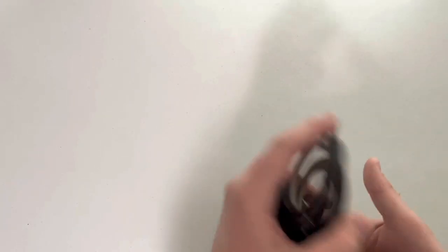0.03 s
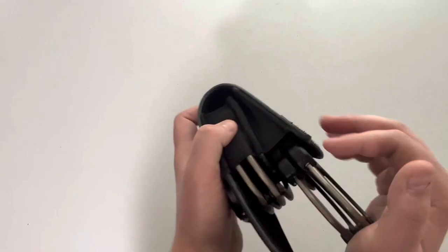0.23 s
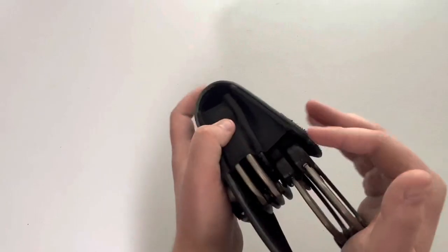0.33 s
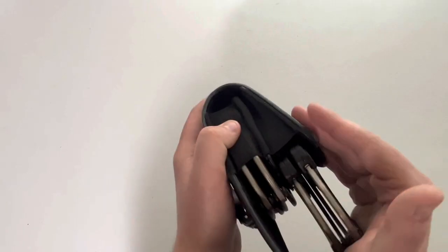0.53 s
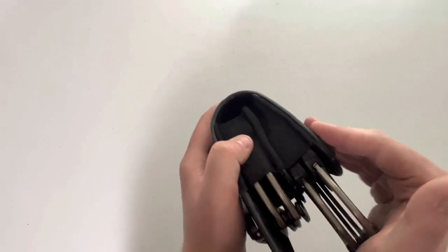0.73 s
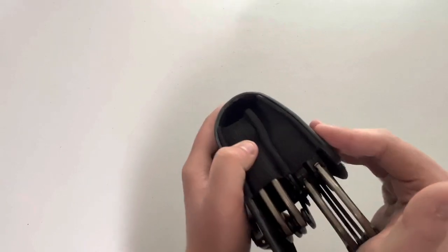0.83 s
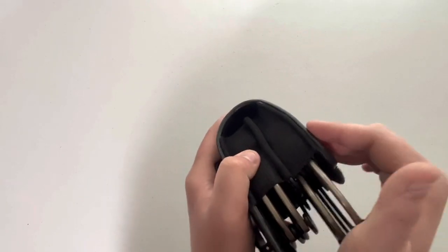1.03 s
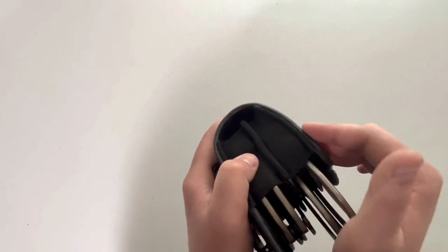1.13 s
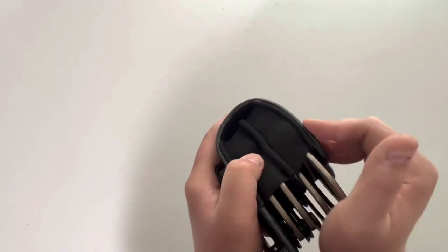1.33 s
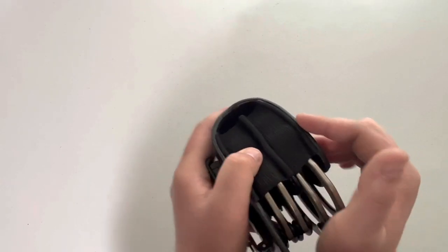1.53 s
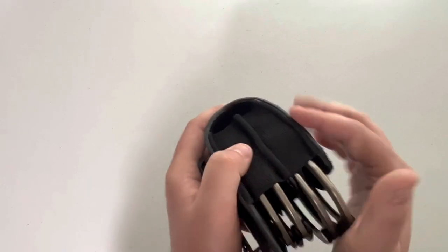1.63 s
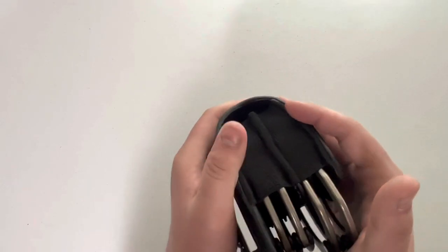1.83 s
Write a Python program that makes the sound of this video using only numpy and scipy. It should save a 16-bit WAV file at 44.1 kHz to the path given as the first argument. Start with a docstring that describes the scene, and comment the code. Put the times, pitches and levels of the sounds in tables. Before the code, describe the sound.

A sharp clatter of metal blades unfolding, followed by two plastic snaps and light ticks.

```python
"""Over a low room rumble and a faint rub of fingers, a latch pings and metal blades scrape and clatter
open, then break off abruptly. Hands are unfolding a plastic blade holder in a small quiet room, close
to a phone's stereo microphone. Fingers slide over the shell and excite the air in the cupped hand;
the shell snaps twice and gives small ticks and knocks, and a loose blade ticks near the end.
Each blow rings the modes of the part it hits; hard contacts add a crack of noise."""
import sys
import numpy as np
from scipy import signal
from scipy.fft import rfft, irfft, next_fast_len
from scipy.io import wavfile

SR = 44100
rng = np.random.default_rng(int(sys.argv[2]) if len(sys.argv) > 2 else 0)


def generate_wav(sig):
    """Save sig (samples, or channels by samples) to the path in sys.argv[1] as 16-bit PCM at SR."""
    pcm = np.round(np.clip(np.atleast_2d(sig).T, -1, 1) * 32767).astype(np.int16)
    wavfile.write(sys.argv[1], SR, pcm)


N = 83790

# Levels are relative; balance is left over right at the microphone.
# room tone: (frequency [Hz], level [dB])
RUMBLE_SPECTRUM = [(20, -18), (40, -16.5), (58, 3.5), (75, -0.5), (120, -3.5), (180, -14.5), (300, -21.5),
                   (600, -32), (2000, -36.5), (6000, -46.5), (16000, -65.5)]
# finger friction: (time [s], body level [dB], rasp level [dB], hiss level [dB])
RUB_LEVELS = [(0, -64.5, -99, -77.5), (.07, -101, -61.5, -88), (.11, -67.5, -54.5, -54.5),
              (.22, -65.5, -50.5, -85), (0.253, -55.5, -75.5, -101), (.30, -65, -85, -94),
              (.385, -57, -66.5, -91), (.44, -66.5, -67.5, -87), (.49, -72.5, -77.5, -90),
              (0.544, -62.5, -68.5, -93), (.585, -49.5, -54, -70), (.63, -56, -62, -91),
              (.70, -55.5, -62, -69), (.79, -56.5, -61, -62.5), (.88, -54, -60, -61),
              (.955, -54.5, -63, -61.5), (.995, -58, -72, -80.5), (1.041, -60.5, -70, -81),
              (1.09, -57, -64.5, -70), (1.15, -51.5, -56.5, -67.5), (1.195, -54, -55, -57.5),
              (1.229, -55, -52.5, -49), (1.29, -62, -62, -54.5), (1.351, -65, -69.5, -60.5),
              (1.395, -72.5, -75, -83), (1.455, -60, -63.5, -69), (1.50, -60.5, -64, -72),
              (1.525, -63.5, -67, -72), (1.564, -73, -61.5, -46), (1.606, -69, -61, -67),
              (1.655, -83, -79.5, -96), (1.701, -77, -62.5, -68), (1.726, -61, -55, -58.5),
              (1.77, -80.5, -74, -90), (1.9, -91.5, -71.5, -93)]
# its hollow body, rasp and treble hiss: (frequency [Hz], level [dB])
BODY_SPECTRUM = [(100, -15.5), (250, -5.5), (450, -7), (680, -10.5), (900, -3), (1080, -4), (1230, 0.5),
                 (1360, -8), (1520, -5), (1750, -4.5), (2200, -16.5), (3500, -22), (8000, -53)]
RASP_SPECTRUM = [(900, -26), (1700, 3.5), (2400, 3.5), (3600, -2.5), (5500, -7), (7500, -10.5),
                 (10000, -19), (16000, -32)]
HISS_SPECTRUM = [(2500, -26.5), (5000, -4), (7000, 3), (9200, 6), (10200, -18), (11500, 11.5), (12600, 1.5),
                 (13800, -13), (15200, 3), (16200, -5.5)]
# the latch letting go: (time [s], latch level [dB], spring level [dB])
LATCH_RELEASES = [(.0831, -51, -35.5), (0.1594, -29, -48), (.162, -45, -34)]
# blade strikes: (time [s], ring [dB], crack [dB], crack t60 [s], pivot knock [dB], balance [dB])
BLADE_STRIKES = [(0.0836, -61, -28.5, 0.013, -52.5, 1.5), (0.145, -53.5, -40, 0.038, -45.5, -1.5),
                 (0.1618, -46.5, -26.5, 0.036, -45.5, 0.5), (0.1829, -37.5, -23.5, 0.015, -31, -2),
                 (0.1869, -34.5, -27.5, 0.033, -48.5, 1), (0.1925, -35, -18.5, 0.008, -38.5, -5.5),
                 (0.1952, -37.5, -25, 0.043, -39, -3), (.2000, -27, -14, 0.013, -33, -3.5),
                 (0.2014, -13.5, -7, .016, -25, -1.5), (0.205, -24, -18.5, 0.013, -46, -1.5),
                 (0.2074, -31.5, -20.5, 0.016, -44, 4), (0.2129, -36, -23, .012, -42.5, -1),
                 (0.216, -37.5, -20.5, 0.0093, -43, 2.5), (0.2192, -35.5, -24, 0.017, -36, 4.5)]
# air resonance between hand and shell: (time [s], frequency [Hz], level [dB])
HOLLOW_TRACK = [(0.201, 1380, -85), (.26, 1385, -65), (.33, 1350, -59.5), (.4, 1322, -71),
                (.5, 1314, -74.5), (.62, 1290, -57), (.8, 1255, -64), (.95, 1241, -56), (1.06, 1221, -69),
                (1.2, 1208, -54), (1.349, 1180, -75), (1.499, 1148, -65), (1.649, 1146, -82)]
# shell clicks: (time [s], ring [dB], crack [dB], crack t60 [s], brightness [Hz], balance [dB])
SHELL_CLICKS = [(.7095, -29, -25.5, 0.0097, 18000, -0.5), (0.8027, -38, -32, 0.0066, 5083, 1),
                (0.804, -19.5, -18, 0.011, 13600, -1.5), (0.8094, -60, -28.5, 0.013, 11000, -5),
                (0.9694, -76, -51, 0.022, 15950, 1), (1.0093, -69, -59, 0.035, 16020, -1),
                (1.057, -76, -49, 0.0088, 22000, 1), (1.2103, -49, -47, 0.059, 16000, 0),
                (1.3168, -61.5, -55.5, .031, 15830, 15), (1.4215, -51.5, -56.5, 0.022, 3400, 6.5),
                (1.4855, -46.5, -54.5, 0.046, 4396, 3.5), (1.5335, -71, -45.5, 0.036, 18060, 1),
                (1.5610, -41, -46, 0.054, 13800, 2.5), (1.7088, -42.5, -40.5, 0.046, 4220, 2),
                (1.7170, -56, -51.5, 0.045, 4000, 5), (1.811, -68.5, -62, 0.053, 3930, 1),
                (1.8564, -73, -72, .025, 6000, 8)]
# knocks against the hand, snaps of the catch, ticks of a loose blade: (time [s], level [dB])
GRIP_KNOCKS = [(.2015, -48.5), (.804, -47), (1.718, -44)]
CATCH_SNAPS = [(0.7106, -32), (0.8063, -51), (1.4935, -55)]
LOOSE_BLADE_TICKS = [(1.486, -60), (1.8144, -58.5), (1.88, -61.5)]
# modes of each struck part: (frequency [Hz], level [dB], t60 [s], balance [dB])
LATCH_MODES = [(2294, 0, 0.035, -6), (6770, -7.5, .05, 5)]
SPRING_MODES = [(3630, -10, 0.045, 1), (8950, -5.5, .025, 2), (10674, -2, 0.02, 0),
                (12040, -7, .015, 0.087), (14950, -4.5, .01, 0.061)]
BLADE_MODES = [(1359, -25.5, 0.056, -1), (2772, -18, .13, -5.5), (4244, -17.5, .08, -2.5),
               (4920, -22.5, .06, 2.5), (6160, -14, 0.12, 8.5), (6311, -12, .08, 6), (6545, -8.5, .05, 6.5),
               (6810, 1.5, 0.049, 10), (7080, -5.5, .05, 6), (7250, -0.5, .032, 6), (8330, -5, .035, 3.5),
               (8860, -12.5, 0.044, 4), (9500, -9, .035, 1), (9950, -14, .04, -1.5),
               (11020, -10.5, .045, -3.5), (11450, -15, .04, 1), (15440, -3.5, .03, -2)]
PIVOT_MODES = [(1012.5, -14.5, 0.019, -1), (1397, -12.5, 0.034, -3), (1750, -14, .02, -4.5),
               (2163, -6.5, .02, -5), (2463, -2.5, .04, -3.5), (2738, -10.5, .04, -4.5),
               (3710, -12, .03, 4)]
GRIP_MODES = [(251, -18.5, 0.033, -2), (360, -17.5, 0.08, -0.5), (590.7, -8, 0.028, 2.5),
              (729, 0, 0.024, 0.5)]
SHELL_MODES = [(943.5, -6.5, 0.023, 0.5), (1065, -9.5, 0.021, 3.5), (1222, -8.5, 0.029, 0),
               (1631, -8, 0.024, -7), (1831, -4, 0.026, 3.5), (3435, -14, 0.011, -7),
               (5840, -4, 0.0065, 12.5), (8440, -7, 0.0077, 9.5), (9380, -2, 0.013, -6.5)]
CATCH_MODES = [(1838, -4.5, 0.035, -9.5), (2623, -6.5, 0.014, -6), (3700, -0.5, 0.016, 0),
               (7330, 2.5, 0.0063, 8), (9600, -9, 0.011, 2)]
LOOSE_BLADE_MODES = [(2552, 0, 0.037, -5), (3700, -9, .025, 6), (4564, -10, .025, 5)]
# contact noise of metal and of plastic: (frequency [Hz], level [dB])
METAL_CRACK_SPECTRUM = [(150, -18), (400, -16.5), (650, -23.5), (1050, -9.5), (1500, -6), (2500, -2),
                        (3300, -3.5), (4600, 1), (5500, -2), (7000, 6), (10500, 0.5), (12300, 2),
                        (13000, -4), (15300, -1), (16200, -5)]
SHELL_CRACK_SPECTRUM = [(150, -15.5), (400, -15), (680, -23), (950, -6.5), (1750, -4), (2200, -4),
                        (2700, -6), (3700, -5.5), (7000, -7), (11500, -1.5), (13500, -8.5), (15500, -6)]
# reflections from table top and walls: (frequency [Hz], level [dB])
ECHO_SPECTRUM = [(100, -5.5), (1000, 0), (3000, 4.5), (6000, 7), (10000, -7.5), (16000, -4)]

RUMBLE_DB, HOLLOW_WIDTH_HZ, ATTACK_S = -61, 137, 0.00051
SLIPS_PER_S, SLIP_SPREAD_DB, SMOOTH_SHARE = 4200, 1.5, 0.24
RUMBLE_WIDTH, RUB_WIDTH, CRACK_WIDTH = 0.17, 0.77, 0.55  # side over mid
MODE_PHASE_SPREAD_RAD = 0.64
BREAK_S, BREAK_DB, BREAK_T60_S = 0.2208, -14, 0.058  # the clatter drops here, then dies away
EARLY_DB, EARLY_T60_S, ROOM_DB, ROOM_T60_S, ECHO_DELAY_S = -9, 0.069, -13.5, 0.18, 0.002
ECHO_ALIKE_HZ = 2500  # below this the reflections reach both microphone ports alike
BLADE_LAG_S, SHELL_LAG_S = 0.000018, 0.00005  # delay at the right port
PEAK_LIMIT, TOP_HZ = 0.85, 16000


def undb(db):
    """Decibels to amplitude."""
    return 10 ** (np.asarray(db) / 20)


def colour(x, points):
    """Causal filter through (frequency [Hz], level [dB]) points that keeps the power of white noise."""
    size = next_fast_len(x.shape[-1] + 4096, real=True) // 2 * 2
    hz, db = np.array(points, float).T
    bin_hz = np.arange(size // 2 + 1) * SR / size
    gain = undb(np.interp(np.log(bin_hz + 1), np.log(hz), db))
    cepstrum = irfft(np.log(gain / np.sqrt(np.mean(gain ** 2))))
    cepstrum[1:size // 2] *= 2  # fold to minimum phase
    cepstrum[size // 2 + 1:] = 0
    return irfft(rfft(x, size) * np.exp(rfft(cepstrum)))[..., :x.shape[-1]]


def spread(pair, width):
    """Two unrelated signals, taken as mid and side, to left and right."""
    return (pair[0] + width * pair[1] * np.array([[1], [-1]])) / np.hypot(1, width)


def pan(db):
    """Left and right gains for a balance."""
    return undb(np.array([[db], [-db]]) / 2)


def fade(t, t60):
    """Exponential decay, 60 dB down at t60."""
    return np.exp(-np.log(1000) * t / t60)


def place(events):
    """Lay (time [s], sound) pairs on one stereo track."""
    out = np.zeros((2, N))
    for start, sound in events:
        i = int(start * SR)
        out[:, i:i + sound.shape[1]] += sound[:, :N - i]
    return out


def ring(modes, bright_hz=SR, scatter_db=0):
    """Decaying modes of one blow, alternating in sign and weighted by where it lands."""
    t, out = np.arange(SR // 5) / SR, 0
    for k, (hz, db, t60, balance) in enumerate(modes):
        # higher modes reach the two ports less alike
        phase = MODE_PHASE_SPREAD_RAD * min(hz / 5000, 1) * rng.standard_normal((2, 1))
        weight = (-1) ** k * undb(db + scatter_db * rng.standard_normal())
        gain = weight / np.hypot(1, (hz / bright_hz) ** 2)
        out = out + gain * pan(balance) * fade(t, t60) * np.sin(2 * np.pi * hz * t + phase)
    return out * np.minimum(t / ATTACK_S, 1)


def crack(spectrum, t60, bright_hz=SR):
    """The dense, quickly dying noise of a contact; soft contacts lose their treble."""
    t = np.arange(SR // 5) / SR
    noise = spread(rng.standard_normal((2, len(t))), CRACK_WIDTH)
    burst = noise * fade(t, t60) * np.minimum(t / ATTACK_S, 1)
    softened = [(hz, db - 10 * np.log10(1 + (hz / bright_hz) ** 4)) for hz, db in spectrum]
    return colour(burst, softened)


def rumble():
    """Room tone: low steady noise, nearly alike at both ports and a little to the right."""
    noise = colour(rng.standard_normal((2, N + SR // 4)), RUMBLE_SPECTRUM)[:, -N:]
    return undb(RUMBLE_DB) * pan(db=-3.5) * spread(noise, RUMBLE_WIDTH)


def fingers():
    """Skin catches and slips on the plastic: dense tiny clicks in the hollow shell, with rasp and hiss."""
    t, out = np.arange(N) / SR, 0
    times, *levels = np.array(RUB_LEVELS).T
    slipping = rng.random(N) < SLIPS_PER_S / SR
    slips = slipping * undb(SLIP_SPREAD_DB * np.minimum(rng.exponential(size=N), 5))
    roughness = np.hypot(slips / slips.std(), SMOOTH_SHARE) / np.hypot(1, SMOOTH_SHARE)
    parts = (BODY_SPECTRUM, RUB_WIDTH / 2), (RASP_SPECTRUM, RUB_WIDTH), (HISS_SPECTRUM, RUB_WIDTH)
    for db, (spectrum, width) in zip(levels, parts):
        grains = spread(rng.standard_normal((2, N)) * roughness, width)
        out = out + colour(grains * undb(np.interp(t, times, db)), spectrum)
    return out * undb(-2.5)


def latch():
    """The latch lets go with a ping and its small spring zings."""
    return place((start, undb(latch_db) * ring(LATCH_MODES) + undb(spring_db) * ring(SPRING_MODES))
                 for start, latch_db, spring_db in LATCH_RELEASES)


def blades():
    """Metal blades swing out close to the microphone, hit each other and knock in their pivot."""
    strikes = []
    for start, ring_db, crack_db, t60, pivot_db, balance in BLADE_STRIKES:
        ringing = undb(ring_db) * ring(BLADE_MODES, scatter_db=1.0)
        contact = undb(crack_db) * crack(METAL_CRACK_SPECTRUM, t60)
        knock = undb(pivot_db) * ring(PIVOT_MODES)
        strikes.append((start, pan(balance) * (ringing + contact + knock)))
    return place(strikes)


def cupped_hand():
    """Rubbing excites the air in the hand: one narrow, noisy resonance that sinks as the hand closes."""
    t = np.arange(N) / SR
    times, hz, db = np.array(HOLLOW_TRACK).T
    noise = rng.standard_normal(N) + 1j * rng.standard_normal(N)
    swell = signal.sosfilt(signal.butter(2, HOLLOW_WIDTH_HZ / 2, fs=SR, output="sos"), noise)
    phase = 2 * np.pi * np.cumsum(np.interp(t, times, hz)) / SR
    tone = np.real(swell * np.exp(1j * phase))
    return tone / tone.std() * undb(np.interp(t, times, db))


def grip():
    """The holder bumps against the hand with a dull knock."""
    return place((start, undb(db) * ring(GRIP_MODES)) for start, db in GRIP_KNOCKS)


def shell():
    """The plastic shell clicks and rings briefly, duller where the contact is soft."""
    clicks = []
    for start, ring_db, crack_db, t60, bright_hz, balance in SHELL_CLICKS:
        ringing = undb(ring_db) * ring(SHELL_MODES, bright_hz)
        contact = undb(crack_db) * crack(SHELL_CRACK_SPECTRUM, t60, bright_hz)
        clicks.append((start, pan(balance) * (ringing + contact)))
    return place(clicks)


def catch():
    """The catch inside the shell snaps and rings."""
    return place((start, undb(db) * ring(CATCH_MODES)) for start, db in CATCH_SNAPS)


def loose_blade():
    """A loose blade ticks faintly as the grip shifts."""
    return place((start, undb(db) * ring(LOOSE_BLADE_MODES, scatter_db=1.5))
                 for start, db in LOOSE_BLADE_TICKS)


def room(x, lag_s):
    """At close range the right port hears a little later; table top and walls answer, more on the left."""
    hz = np.arange(N + 1) * SR / (2 * N)
    port_delay = np.exp(-2j * np.pi * hz * np.array([[0], [lag_s]]))
    direct = irfft(rfft(x, 2 * N) * port_delay)[:, :N]
    t, echo = np.arange(SR // 2) / SR, 0
    highpass = signal.butter(1, ECHO_ALIKE_HZ, "high", fs=SR)
    for db, t60 in (EARLY_DB, EARLY_T60_S), (ROOM_DB, ROOM_T60_S):
        mid, side = rng.standard_normal((2, len(t))) * fade(t, t60) * (t > ECHO_DELAY_S)
        tail = spread([mid, signal.lfilter(*highpass, side)], width=0.87)
        echo = echo + undb(db) * tail / np.sqrt(np.sum(tail ** 2) / 2)
    reflections = signal.fftconvolve(direct, colour(echo, ECHO_SPECTRUM), axes=1)[:, :N]
    return direct + pan(db=5) * reflections


def scene():
    """The clatter breaks off abruptly, echo and all; handling and room tone carry on."""
    since_break = np.arange(N) / SR - BREAK_S
    dying = undb(BREAK_DB) * fade(np.maximum(since_break, 0), BREAK_T60_S)
    opening = room(blades() + latch(), BLADE_LAG_S) * np.where(since_break < 0, 1, dying)
    handling = shell() + catch() + grip() + loose_blade() + fingers() + cupped_hand()
    return opening + room(handling, SHELL_LAG_S) + rumble()


def record(dry):
    """The phone rounds the loudest peaks and cuts the top."""
    rounded = PEAK_LIMIT * np.tanh(dry / PEAK_LIMIT)
    return signal.sosfilt(signal.ellip(10, 0.2, 80, TOP_HZ, fs=SR, output="sos"), rounded)


dry = scene()
out = record(dry)
generate_wav(out)
```